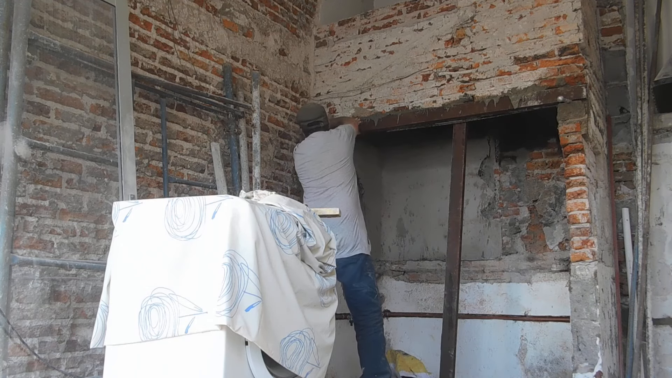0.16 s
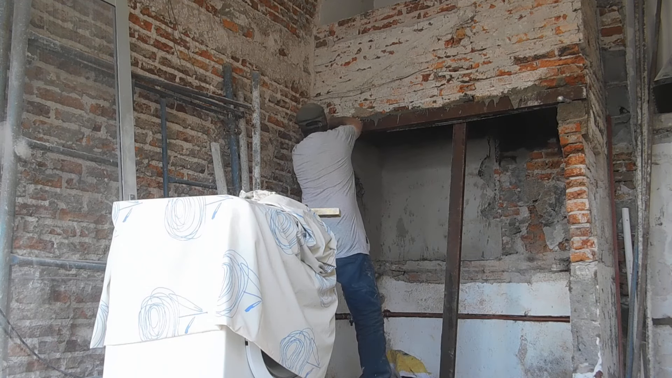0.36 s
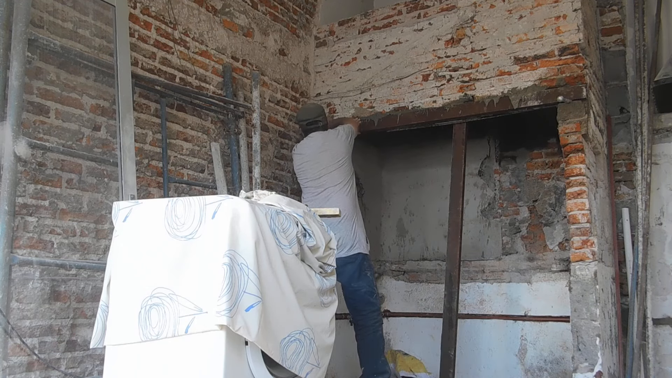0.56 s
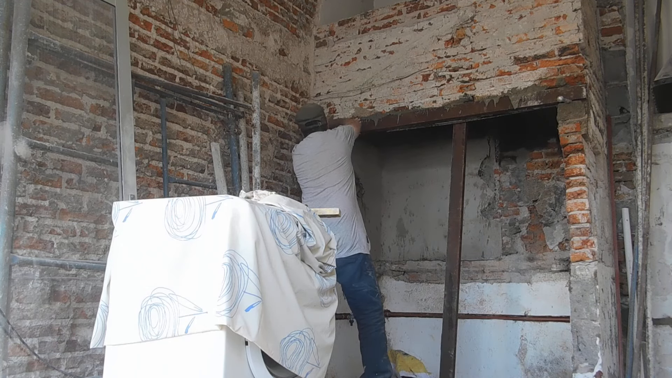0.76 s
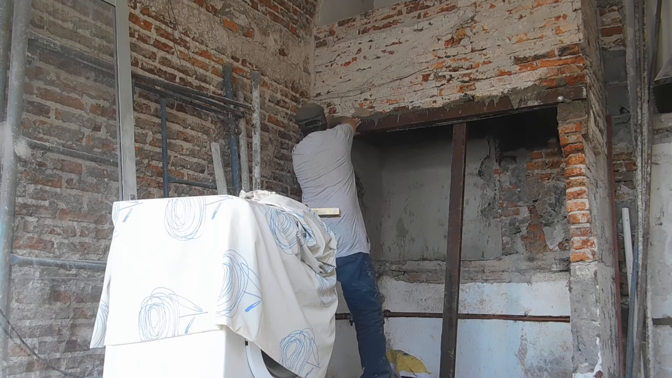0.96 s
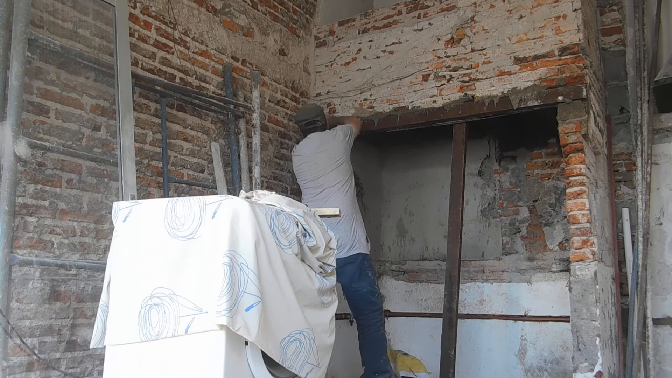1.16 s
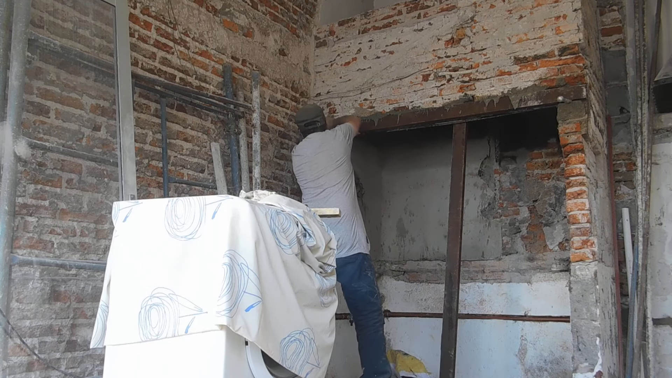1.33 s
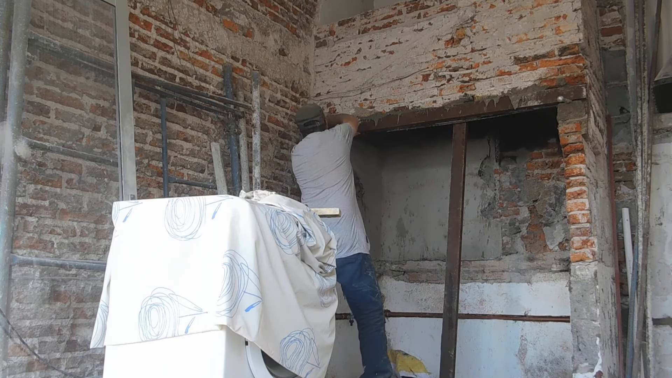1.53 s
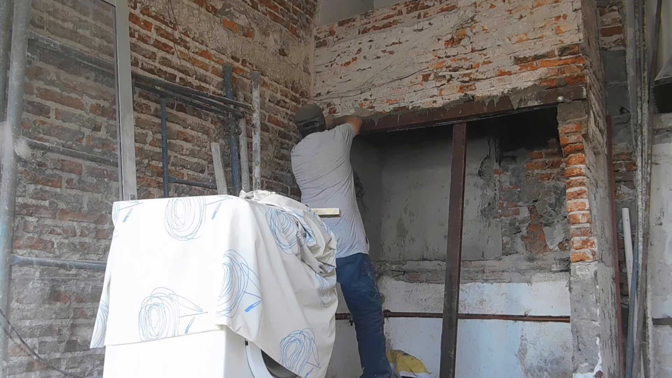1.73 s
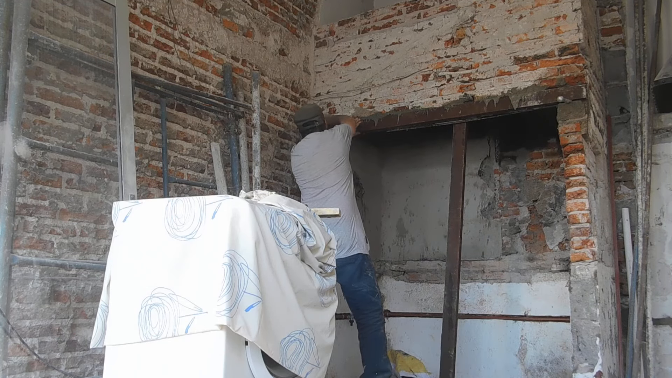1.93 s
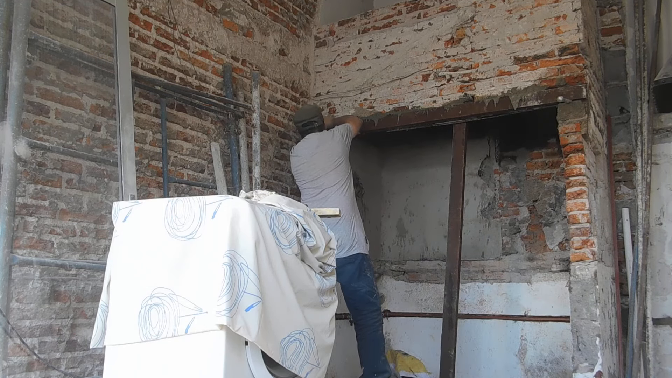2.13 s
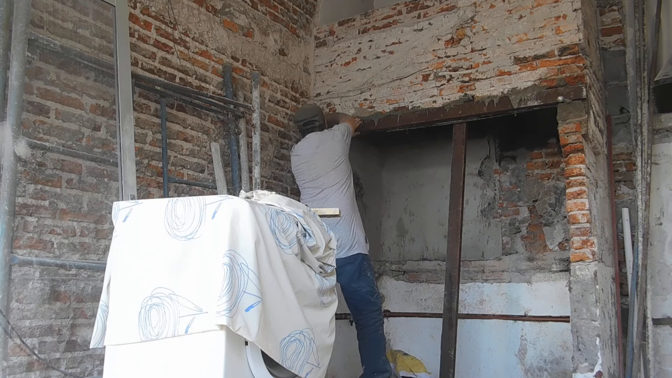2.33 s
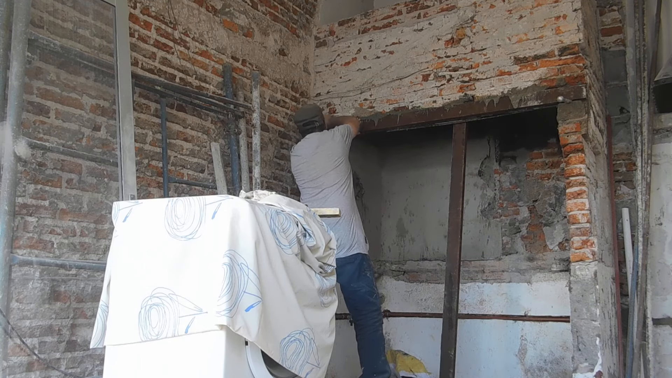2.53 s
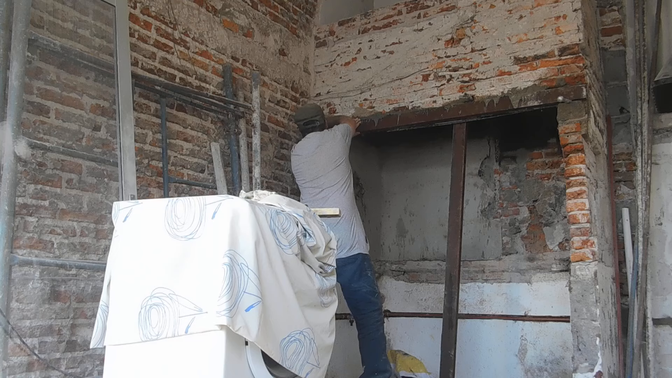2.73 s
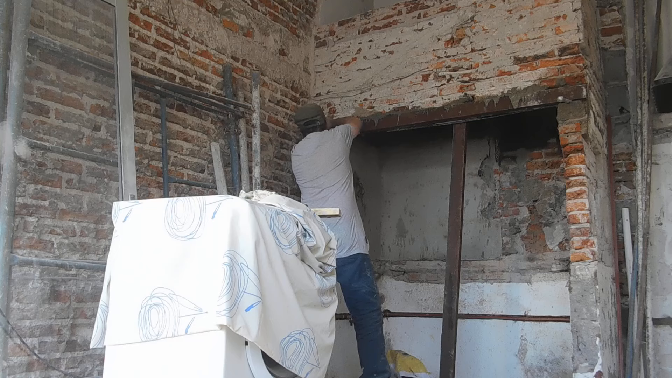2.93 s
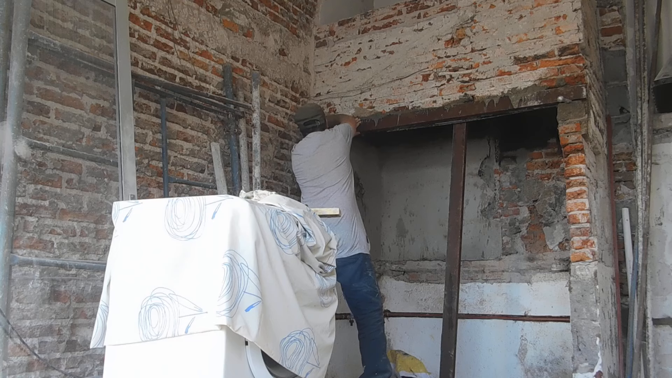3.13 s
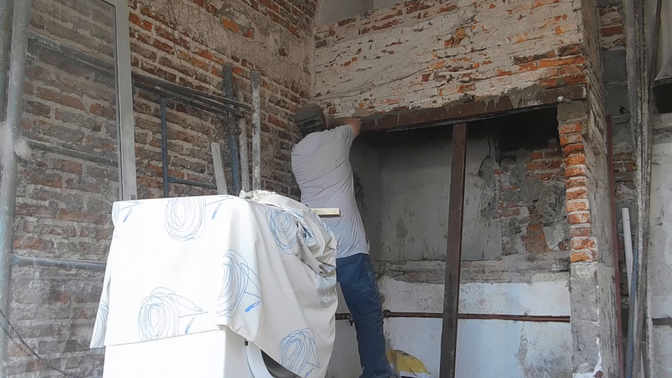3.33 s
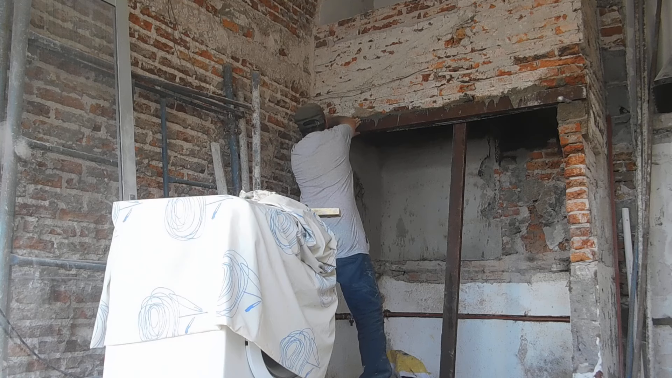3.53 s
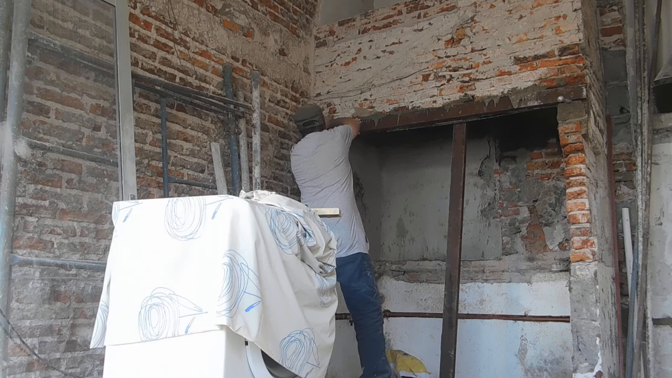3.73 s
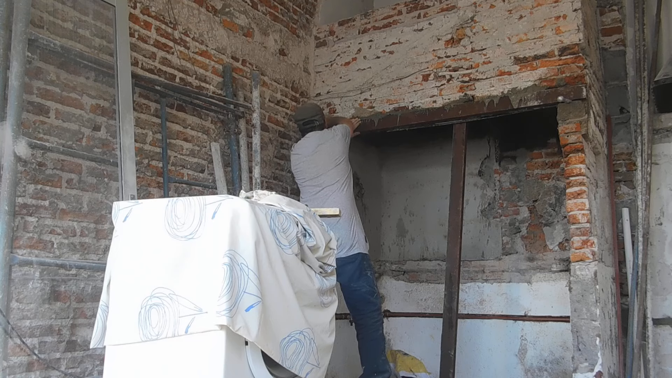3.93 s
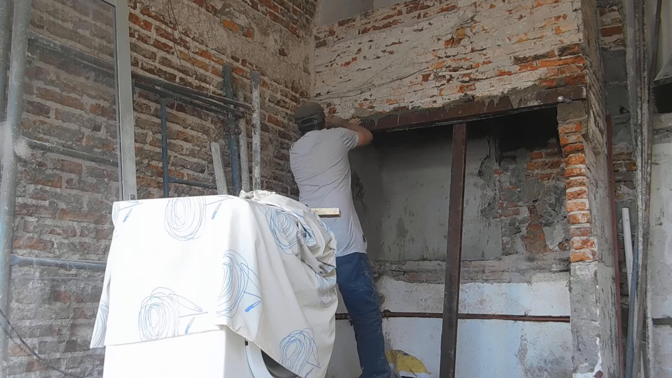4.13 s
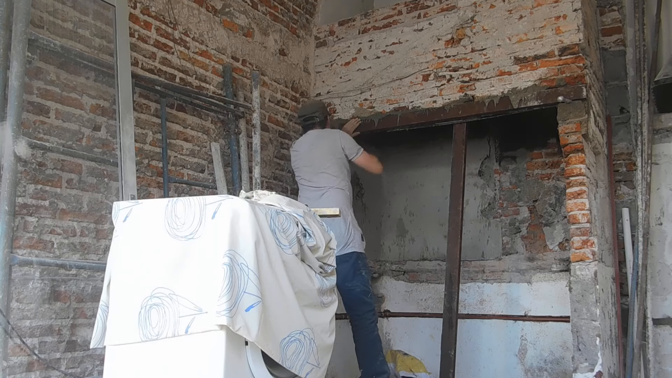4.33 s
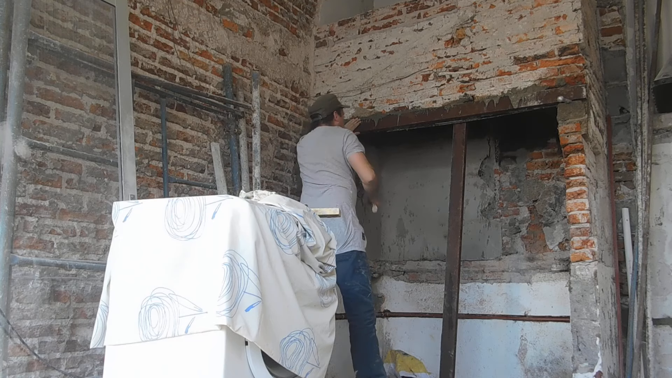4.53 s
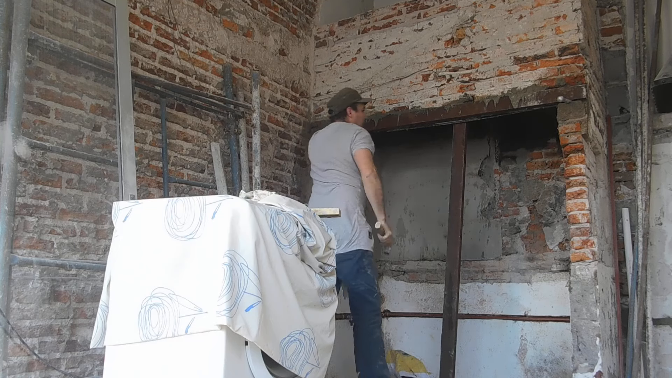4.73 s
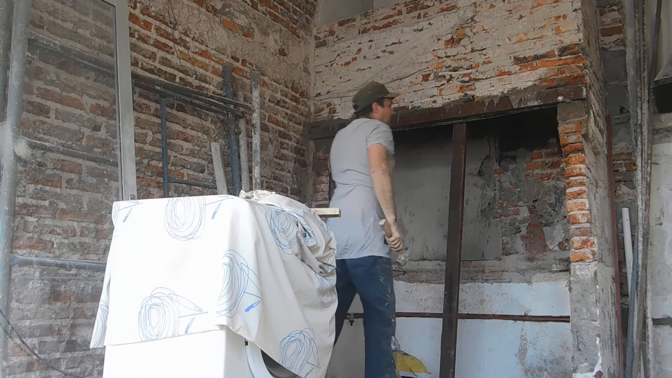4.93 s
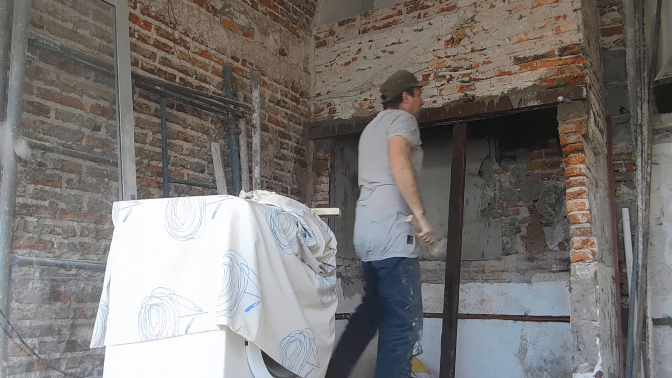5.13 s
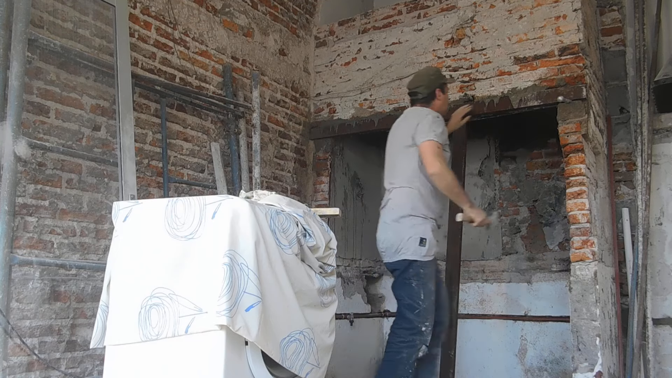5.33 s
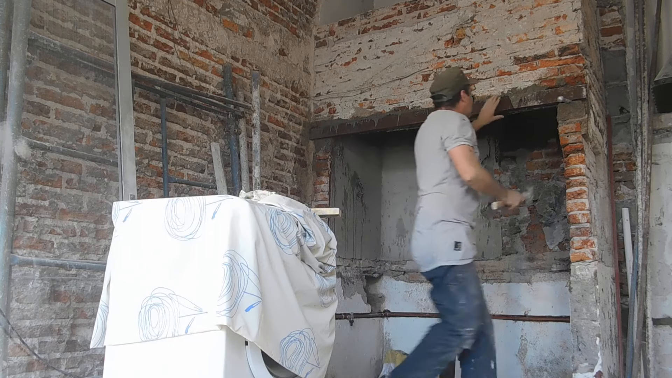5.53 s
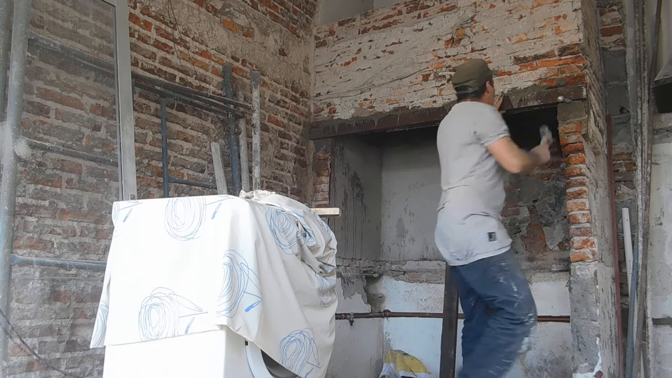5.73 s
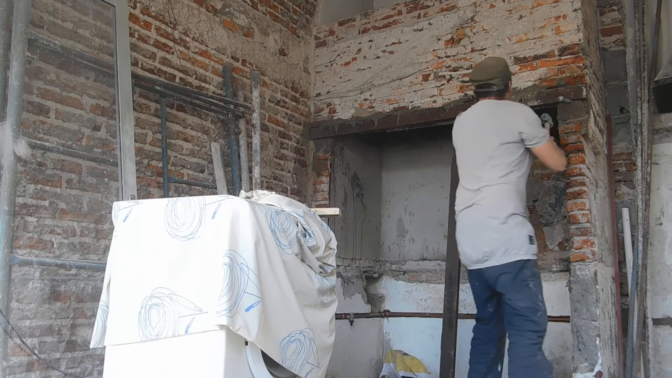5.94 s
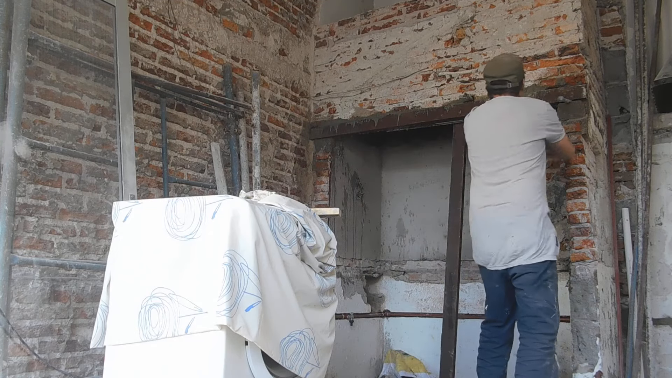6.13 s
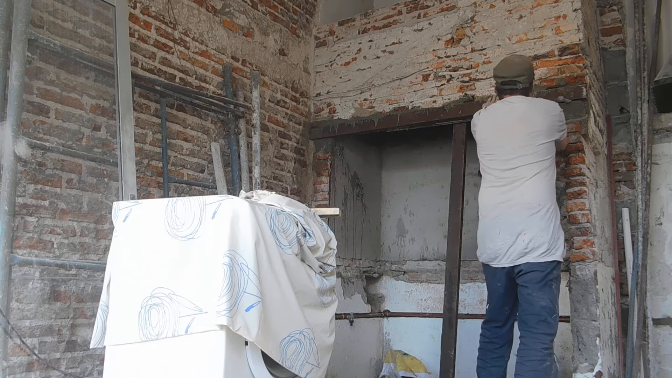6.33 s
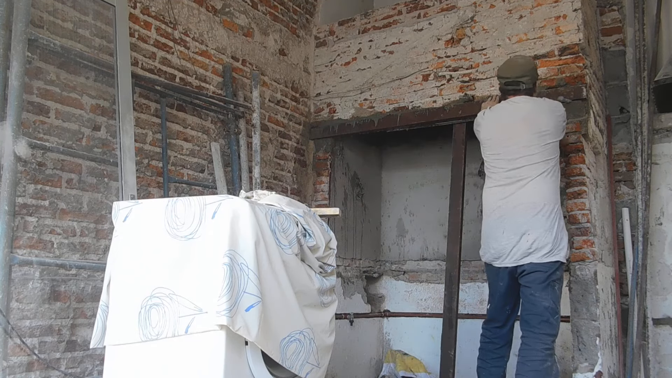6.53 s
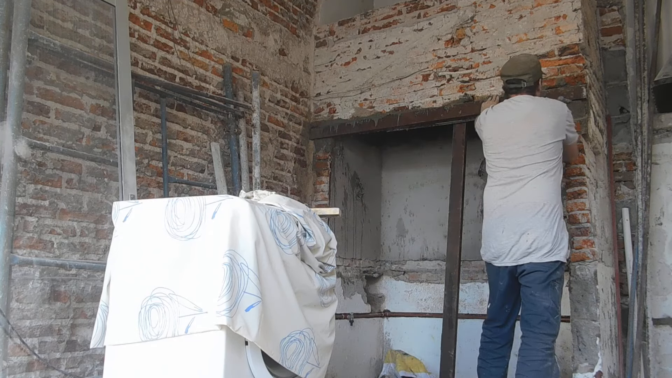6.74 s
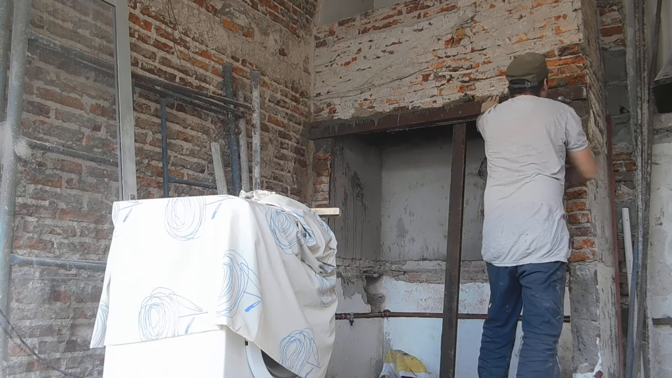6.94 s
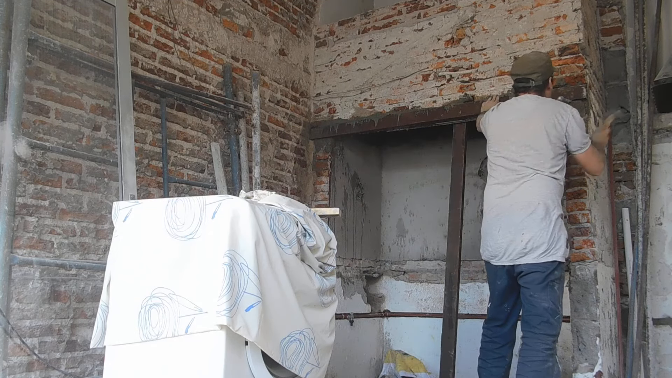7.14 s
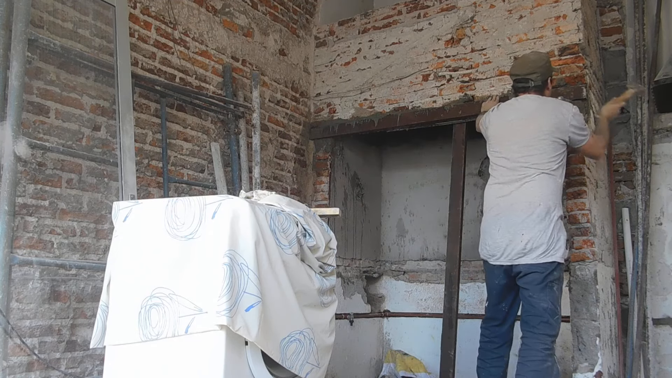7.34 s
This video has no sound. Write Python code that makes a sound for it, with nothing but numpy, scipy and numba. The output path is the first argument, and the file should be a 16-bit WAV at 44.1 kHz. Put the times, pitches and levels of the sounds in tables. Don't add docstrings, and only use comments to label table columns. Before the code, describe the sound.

A hammer clangs on a mortared steel beam in ten steady, overloaded blows; shoes scrape over grit, then one last blow lands at the other end.

```python
import sys
import numpy as np
from scipy import signal
from scipy.fft import rfft, irfft
from scipy.io import wavfile
from scipy.ndimage import uniform_filter1d
from numba import njit

SR = 44100
rng = np.random.default_rng(int(sys.argv[2]) if len(sys.argv) > 2 else 0)


def field_ratio(decibels):
    return 10 ** (np.asarray(decibels, dtype=float) / 20)


def transcribe(signal):
    frames = np.atleast_2d(signal).T
    limited = np.clip(frames, -1, 1)
    pcm = np.round(limited * 32767).astype(np.int16)
    wavfile.write(sys.argv[1], SR, pcm)


N = 329868
HALF_OCTAVES = 28 * 2 ** np.arange(0, 9.1, 0.5)


def seconds(length_s):
    return np.arange(int(length_s * SR)) / SR


def along(table, hz):
    at, value = np.transpose(table)
    return np.interp(np.log(np.maximum(hz, 1)), np.log(at), value)


def colour(x, table):
    hz = np.fft.rfftfreq(x.shape[-1], 1 / SR)
    return irfft(rfft(x) * field_ratio(along(table, hz)), x.shape[-1])


def band(x, hz, width_hz):
    return signal.lfilter(*signal.iirpeak(hz, hz / width_hz, SR), x)


def bandpass(x, low_hz, high_hz):
    sos = signal.butter(2, [low_hz, high_hz], "bandpass", fs=SR, output="sos")
    return signal.sosfilt(sos, x)


def unit(x):
    return x / np.sqrt(np.mean(x ** 2))


def walk(rate_hz):
    hold = int(SR / rate_hz)
    levels = rng.standard_normal(N // hold + 1)
    return uniform_filter1d(np.repeat(levels, hold), hold)[:N]


def add(out, sound, start_s):
    i = int(start_s * SR)
    out[..., i:i + sound.shape[-1]] += sound[..., :out.shape[-1] - i]


def through(sound, response):
    return signal.fftconvolve(sound[None], response, axes=1)


def grit(size, per_s, spread_db):
    chance = rng.random((size, 2))
    hits = chance[:, 0] < per_s / SR
    sizes = field_ratio(-spread_db * np.log(chance[:, 1] + 1e-9))
    return unit(hits * sizes * rng.standard_normal(size))


def pair(size, hz, likeness):
    like = np.clip(along(likeness, hz), 0, 1)
    mid, side = bandpass(rng.standard_normal((2, size)), hz / 2 ** 0.29, hz * 2 ** 0.24)
    return np.sqrt((1 + like) / 2) * mid + np.sqrt((1 - like) / 2) * side * np.array([[1], [-1]])


# pitch_hz, level_db
TRAFFIC_COLOUR = [(12, -36), (20, 1), (60, -4), (255, -8.5), (310, -5.5), (388, -14.5), (574, -4),
                  (780, -6.5), (949, -9.5), (1610, -11.5), (4540, -28), (14300, -31), (16000, -37)]
# pitch_hz, likeness_0_to_1
TRAFFIC_LIKENESS = [(60, 0.99), (300, .95), (700, 0.6), (1400, 0.3), (3000, 0.3)]
# peak_s, level_db
ENGINE_SWELLS = [
    (5.2, 2),
    (5.55, -22),
    (5.95, 6),
    (7.1, 10),
]


def town():
    swell_db = 0.45 * walk(0.92)
    wash = 0
    for hz in HALF_OCTAVES:
        level_db = along(TRAFFIC_COLOUR, hz) + swell_db + 2.4 * walk(18)
        wash = wash + pair(N, hz, TRAFFIC_LIKENESS) * field_ratio(level_db)
    t = np.arange(N) / SR
    engine_db, swell_s = -55, 0.079
    for peak_s, level_db in ENGINE_SWELLS:
        engine_db = engine_db + level_db * np.exp(-((t - peak_s) / swell_s) ** 2)
    drone = unit(band(band(rng.standard_normal(N), 69, 7), 69, 25))
    return field_ratio(-52.5) * unit(wash) + field_ratio(engine_db) * drone


# start_s, length_s, level_db, fine_grit_db, sole_weight_db
SCUFFS = [(-.1, .17, -37, 0, -7), (.06, 0.078, -39.5, -1.5, -5), (4.811, 0.024, -40.5, -9, -6),
          (4.82, .1, -48, -2.5, -8.5), (4.932, .16, -39, -3, -2), (5.259, 0.01, -45.5, -6.5, -18),
          (5.075, 0.4, -56.5, 4.5, -11.5), (5.426, 0.17, -32.5, -5, -2.5), (5.53, 0.095, -27, -17, -13.5),
          (5.69, .13, -32, -10.5, -8.5), (5.856, 0.15, -31, -3.5, -4.5), (5.978, .15, -25.5, -13, -18.5)]
# pitch_hz, width_hz, level_db
SOLE = [(1750, 1000, 9.5), (2310, 710, -5.5), (1200, 1200, 2), (3530, 2800, -12.5)]


def shoes():
    t, grains = np.arange(N) / SR, grit(N, 5500, 1.6)
    rasp = unit(sum(field_ratio(db) * band(band(grains, hz, width), hz, 2 * width) for hz, width, db in SOLE))
    hiss = unit(band(grit(N, 9000, 2.7), 8000, 14000))
    weight = unit(band(grains, 620, 740))
    rasp = field_ratio(2.1 * walk(30)) * rasp
    hiss = field_ratio(3.0 * walk(30)) * hiss
    press_share, press_power = 0.55, 1.5
    lift_db_per_s, grit_stop_db_per_s = 384, 500.5
    out = np.zeros(N)
    for start_s, length_s, level_db, hiss_db, weight_db in SCUFFS:
        press = np.clip((t - start_s) / (press_share * length_s), 0, 1) ** press_power
        lifted_s = np.maximum(t - start_s - length_s, 0)
        sole = field_ratio(-lift_db_per_s * lifted_s) * (rasp + field_ratio(weight_db) * weight)
        fine = field_ratio(hiss_db - grit_stop_db_per_s * lifted_s) * hiss
        out += field_ratio(level_db) * press * (sole + fine)
    return field_ratio(-6.0) * out


# start_s, pitch_hz, level_db, t60_s
TINKLES = [
    (.105, 5500, -46, 0.25),
    (.24, 5500, -27, 0.17),
    (4.85, 8000, -54, 0.07),
    (5.16, 5150, -71, .6),
    (6.165, 8200, -46, 0.052),
    (7.425, 2900, -58, 0.092),
    (7.43, 5050, -64, .2),
]


def tinkles():
    out, t = np.zeros(N), seconds(0.6)
    for start_s, hz, level_db, t60_s in TINKLES:
        partials = np.sin(2 * np.pi * hz * t) + 0.55 * np.sin(2 * np.pi * (hz + 55) * t)
        add(out, field_ratio(level_db - 60 * t / t60_s) * partials, start_s)
    return out


# start_s, peak_db, pitch_hz, bright_db, length_s
CHIPS = [(0.114, -33.5, 2560, -3.5, 0.0082), (1.331, -40.5, 1560, -9, 0.0077),
         (2.1565, -44, 1660, -13.5, 0.0055), (2.919, -36, 1480, -18.5, 0.012), (3.838, -43, 1550, -5, 0.01),
         (4.2094, -42, 1540, -4, 0.0067), (4.338, -46, 1600, -8.5, 0.02), (4.402, -38, 1830, -27.5, 0.016),
         (4.551, -52, 1880, -24.5, 0.02), (4.638, -46.5, 2050, -8.5, 0.027),
         (4.8204, -46, 1880, -16.5, 0.013), (5.269, -48.5, 1750, -23.5, 0.029),
         (5.333, -50, 1420, -18.5, 0.0077), (6.1555, -30, 2060, -13, 0.014),
         (6.462, -58.5, 1630, -3.5, 0.013), (6.4875, -39.5, 1970, -11, 0.014),
         (6.501, -43.5, 2050, -17, 0.037), (6.9194, -61, 1540, -2.5, 0.022),
         (7.1544, -63.5, 1640, -25, 0.011), (7.222, -51, 1710, -3, 0.0093), (7.322, -49, 1650, -22.5, 0.01),
         (7.424, -63.5, 2880, -27, 0.02)]


def chips():
    out, t = np.zeros(N), seconds(0.3)
    for start_s, peak_db, hz, bright_db, length_s in CHIPS:
        burst = rng.standard_normal(len(t))
        pitched = unit(band(band(burst, hz, hz / 4), hz, hz / 0.61))
        crumble = 0.65 * unit(band(burst, 1.4 * hz, hz))
        edge = field_ratio(bright_db) * unit(band(burst, 7000, 9000))
        envelope = (1 - np.exp(-t / 0.0017)) * np.exp(-t / length_s)
        add(out, field_ratio(peak_db) * (pitched + crumble + edge) * envelope, start_s)
    return out


# pitch_hz, t60_s
YARD_T60 = [(60, 0.3), (250, 0.44), (700, 0.41), (1500, 0.41), (3000, 0.36), (6000, 0.36), (12000, 0.2)]
# pitch_hz, likeness_0_to_1
YARD_LIKENESS = [(60, 0.6), (300, .55), (700, 0.78), (1400, 0.42), (3000, 0), (7000, 0.)]
# delay_s, lift_db, smear_s
FAR_WALL = (0.16, 6.66, 0.0034)


def yard(wet_db=-1, build_s=0.0032):
    t = seconds(0.7)
    delay_s, lift_db, smear_s = FAR_WALL
    tail = sum(pair(len(t), hz, YARD_LIKENESS) * field_ratio(-60 * t / along(YARD_T60, hz)) for hz in HALF_OCTAVES)
    far_wall = field_ratio(lift_db / (1 + np.exp((delay_s - t) / smear_s)))
    tail = tail * (1 - np.exp(-t / build_s)) * far_wall
    response = field_ratio(wet_db) * tail / np.sqrt(np.sum(tail ** 2) / 2)
    response[0, 1] += 1
    response[1, 0] += 1
    return response


def beam(modes, hard_db, t):
    hz, level_db, t60_s = np.transpose(modes)[:, :, None]
    uneven_db = 1.0 * rng.standard_normal(hz.shape)
    tilt_db = 0.5 * hard_db * np.log2(np.maximum(hz / 1500, 1))
    size = field_ratio(level_db + uneven_db + tilt_db)
    steps = rng.standard_normal((len(hz), len(t) // 64 + 1))
    waver = 0.125 * np.cumsum(steps, axis=1).repeat(64, axis=1)[:, :len(t)]
    decay = np.exp(-np.log(1000) * t / (0.6 * t60_s))
    return np.sum(size * decay * np.sin(2 * np.pi * hz * t + waver), axis=0)


# start_s, level_db, hardness_db_per_octave, brick_share_db, falling_grit_db
BLOWS = [(0.24, -12.5, 8, 6.5, -15), (0.657, -6, -10.5, 2, -33.5), (1.027, -8.5, -6, 4.5, -34),
         (1.442, -6.5, 4.5, 4, -21), (1.858, -6.5, -3.5, 2.5, -31.5), (2.2698, -4, -27, -2.7, -43),
         (2.684, -8.5, -1.2, 6, -14.5), (3.098, -8.5, 7, 6, -27.5), (3.5, -8.5, 4, 6.5, -27.5),
         (3.905, -9, 5, 5, -29.5), (6.554, -6.5, -4, -0.5, -41)]
# pitch_hz, level_db, t60_s
NEAR_END = [(444, -28, 0.79), (556, -18, 0.77), (571.5, -6.5, 0.41), (720, -30.5, 0.22), (785, -13, 0.75),
            (784, -15, 0.26), (814, -6.5, 0.77), (863, -12, 0.65), (957, -23.5, 0.58), (1012, -11, 0.68),
            (1064.4, -6.5, 0.35), (1075.4, 2, 0.4), (1320.3, 3, 0.35), (1360, -5.5, 0.24), (1540, -6, 0.53),
            (1560, -8.5, 0.5), (1677, -1, 0.33), (1667, -10, 0.39), (2026, -17, 0.6), (2080, -22.5, 0.37),
            (2411, -20.5, 0.96), (2743, -18.5, 0.33), (2790, -16.5, 0.29), (3130, -16, 0.62),
            (3545, -22.5, 0.38), (3540, -25, 0.61)]
# pitch_hz, level_db, t60_s
FAR_END = [(343, -20, 0.82), (550, -15.5, 0.49), (630, -8, 0.5), (763, -5, 0.52), (800, -4.5, 0.48),
           (806, -8, 0.31), (1069, 3.5, 0.44), (1180, -0.5, 0.22), (1340, -1, 0.43), (1420, -1, 0.15),
           (1558, -0.5, 0.21), (1515, -3.5, 0.52), (1523, -9, 0.23), (1608, 8, 0.28), (1710, -4.5, 0.47),
           (1686, -9, 0.28), (1750, -10, 0.33), (2020, -21.5, 0.95), (2350, -6, 0.4), (2720, -23.5, 0.36),
           (2730, -11, .4), (3320, -19, 0.37)]
# pitch_hz, level_db, t60_s
LONG_RING = [
    (765, -44, 3.0),
    (152.5, -39, 3.2),
]
# pitch_hz, level_db_per_hz
BRICK = [(40, -23), (150, -34.5), (400, -10), (800, -0.5), (1200, -4), (1800, -2), (2300, -6.5), (3200, -6),
         (5000, -22.5), (9000, -34), (16000, -53)]


def masonry(hard_db, t):
    tilt = [[0, hard_db * np.log2(max(hz / 3300, 1))] for hz, _ in BRICK]
    body = unit(colour(rng.standard_normal(len(t)), np.array(BRICK) + tilt))
    return field_ratio(7.5) * body * (np.exp(-t / 0.0054) + 0.35 * np.exp(-t / 0.054))


def hammer():
    out, t = np.zeros((2, N)), seconds(0.8)
    broadside = yard(wet_db=-3.5)
    for start_s, level_db, hard_db, crack_db, grit_db in BLOWS:
        hard_db = np.clip(hard_db, -12, 8)
        modes = NEAR_END if start_s < 5 else FAR_END
        ring = field_ratio(5.5) * beam(modes + LONG_RING, hard_db, t)
        crack = masonry(hard_db, t)
        tick = field_ratio(10.5) * band(rng.standard_normal(len(t)), 3500, 4200) * np.exp(-t / 0.0023)
        dust = band(grit(len(t), 3000, 3.0), 6000, 9000) * t / 0.05 * np.exp(-t / 0.014)
        scattered = through(field_ratio(crack_db) * crack + field_ratio(grit_db) * dust, yard())
        straight = through(ring + field_ratio(crack_db) * tick, broadside)
        add(out, field_ratio(level_db) * (scattered + straight), start_s)
    return out


def scene():
    small = through(shoes() + tinkles() + chips(), yard(wet_db=-2.5))[:, :N]
    return field_ratio(-4.0) * hammer() + small + town()


@njit
def gain_control(x, top, attack, release):
    gain, level = np.empty(len(x)), 0.
    for i in range(len(x)):
        level += (x[i] - level) * (attack if x[i] > level else release)
        gain[i] = top / max(level, top)
    return gain


def top_cut(x):
    return signal.sosfilt(signal.butter(12, 15800, fs=SR, output="sos"), x)


def record(dry):
    attack_s, release_s = 0.0017, 0.015
    gain = gain_control(np.abs(dry).max(axis=0), 1.31, 1 / (attack_s * SR), 1 / (release_s * SR))
    late = dry * gain
    rounded = np.clip(0.43 * np.tanh(late / 0.55) + 0.3 * late, -1, 1)
    strain = rounded ** 2 * (0.016 + 0.25 * rng.standard_normal(rounded.shape))
    rumble = bandpass(strain, 40, 380)
    return top_cut(np.clip(rounded + rumble, -1, 1))


dry = scene()
out = record(dry)
transcribe(out)
```